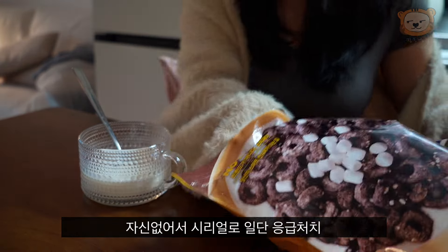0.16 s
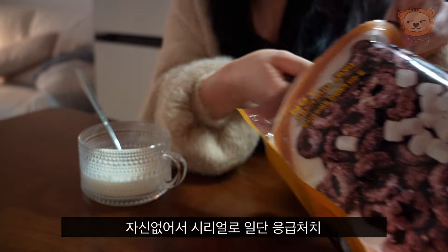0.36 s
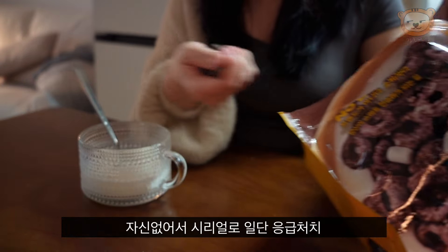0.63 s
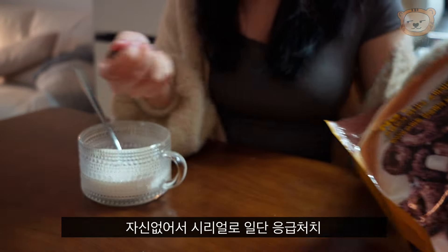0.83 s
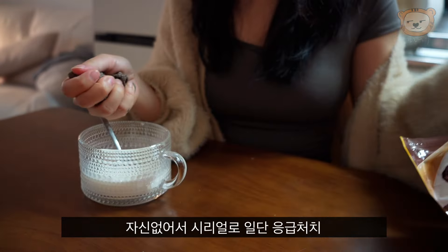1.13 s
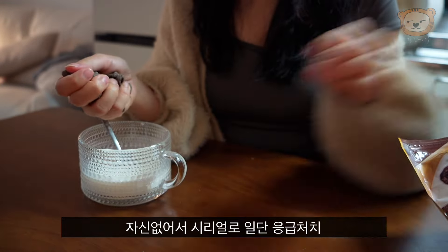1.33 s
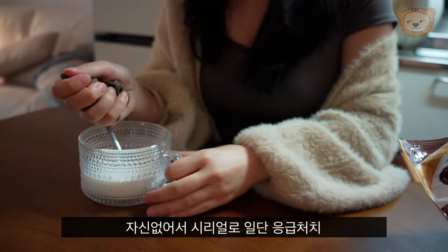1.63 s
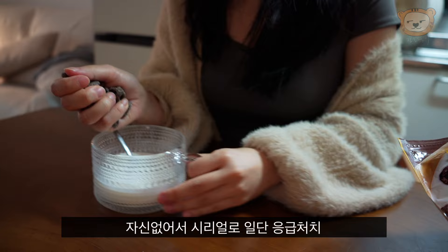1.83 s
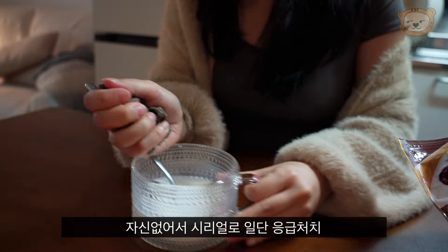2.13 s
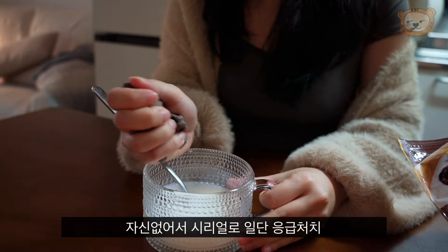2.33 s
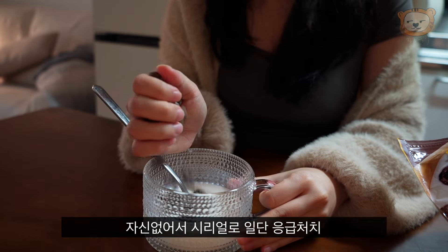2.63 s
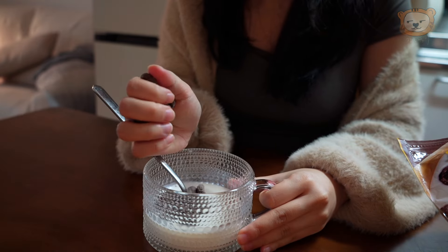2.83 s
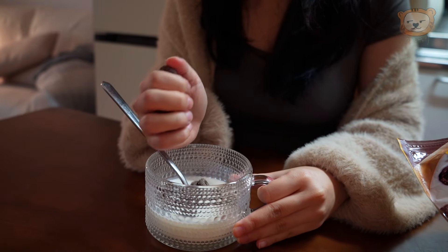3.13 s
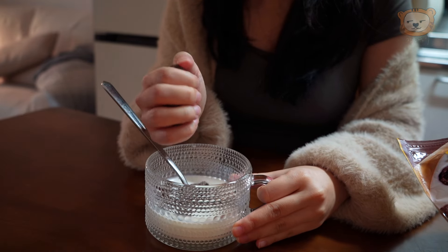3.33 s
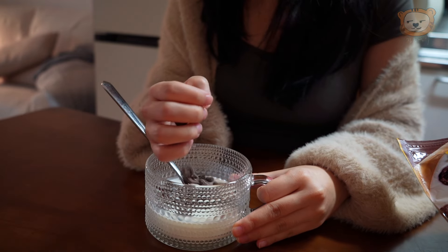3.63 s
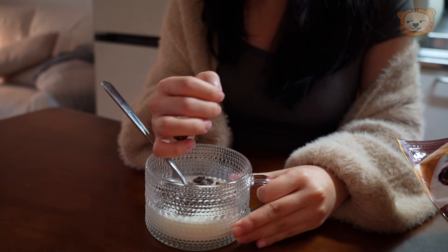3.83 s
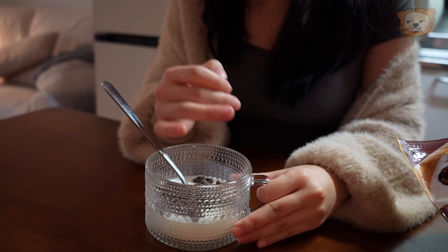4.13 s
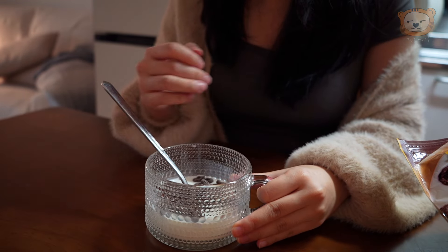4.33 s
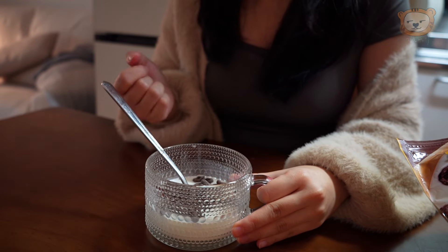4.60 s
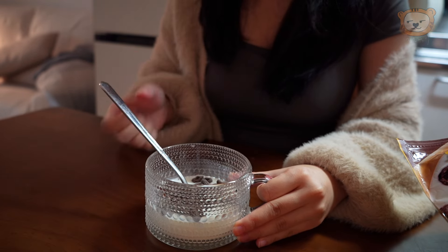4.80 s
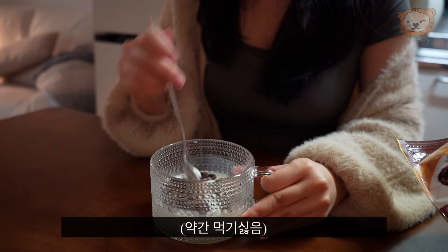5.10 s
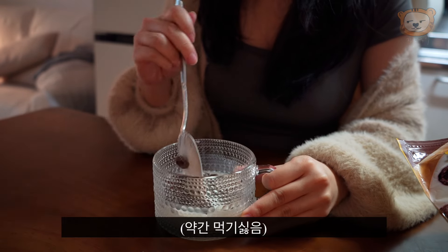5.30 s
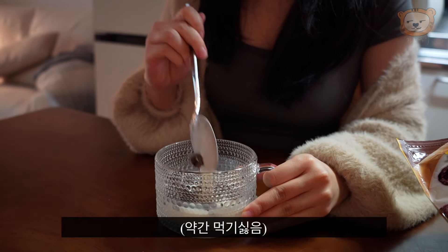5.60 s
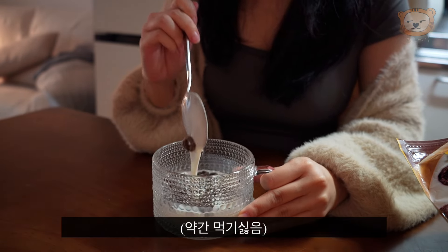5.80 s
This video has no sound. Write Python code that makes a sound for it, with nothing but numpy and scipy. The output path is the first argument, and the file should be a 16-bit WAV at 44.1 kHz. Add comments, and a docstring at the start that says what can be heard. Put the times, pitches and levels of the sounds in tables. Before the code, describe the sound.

In a small quiet room, close to the microphone, a full plastic bag crinkles, rubs and bumps the table. A glass mug then scrapes and judders over the wood with its spoon ticking. Dry cereal rings fall in two small clusters, with tiny cracks, glass pings and soft plops. Finally the spoon clinks and the mug is nudged with dull knocks.

```python
"""Cereal dropping into a mug of milk

A hand leaves a plastic cereal bag (noise grains and creasing snaps), which is put aside on a wooden table.
A glass mug of milk drags closer (stick-slip through table modes), its spoon rattling in decaying modes.
Cereal rings drop in a few at a time, each a crack, glass ping and thud; then the spoon is picked up
and bumps the bottom through the milk. A small, quiet room rings after it all, over still air."""
import sys
import numpy as np
from scipy import signal
from scipy.fft import rfft, irfft, next_fast_len
from scipy.io import wavfile

SR = 44100
rng = np.random.default_rng(int(sys.argv[2]) if len(sys.argv) > 2 else 0)


def wrap_up_sound(samples):
    """Save the sound to the file named by the first command line argument, as 16-bit audio."""
    columns = np.atleast_2d(samples).T
    # keep every value between -1 and 1, then stretch to whole-number steps
    tamed = np.clip(columns, -1, 1)
    steps = np.round(tamed * 32767).astype(np.int16)
    wavfile.write(sys.argv[1], SR, steps)


N = 262395
TIME = np.arange(N) / SR
AGE = TIME[:SR // 2]  # seconds since a blow

# table top under the mug: pitch_hz, level_db, t60_s
TABLE_MODES = [(175.4, -1.5, 0.15), (281.5, 2.5, 0.18), (295, 2.5, 0.045), (308, -4, 0.12), (400, -29, 0.1),
               (485.5, 0.5, 0.077), (582, -24, 0.13), (692, 3, 0.032), (774, -28, 0.032), (944, -12, 0.038),
               (1130, -7.5, 0.075), (1200, -25, 0.094)]
# hiss spectrum of film, also used for the faint gratings: freq_hz, density_db (per Hz)
FILM_COLOUR = [(1500, 1), (3500, 4), (5500, 0.5), (7000, -4.5), (9000, -7), (10500, -16.5), (16000, -26)]
# brittle crack or tick of a hard contact: freq_hz, density_db (per Hz)
CRACK_COLOUR = [(200, 13.5), (600, -20.5), (1500, 2), (2400, 7.5), (3100, -1), (5000, 5.5), (7000, 2.5),
                (9300, -0.5), (10700, -10.5), (13000, -8), (16000, -47)]
# broad thud and scrape of contacts on the table: freq_hz, density_db (per Hz)
THUD_COLOUR = [(40, -15), (130, -32.5), (210, -9.5), (280, 0), (490, -1), (720, -13.5), (1200, -55),
               (2000, -25), (5000, -86)]


def undb(db):
    """Decibels to gain."""
    return 10 ** (np.asarray(db) / 20)


def unit(x):
    """Scale to rms 1."""
    return x / np.sqrt(np.mean(x ** 2))


def crest(x):
    """Scale to peak 1."""
    return x / np.abs(x).max()


def along(points, hz):
    """Read (Hz, value) points on a log-frequency axis."""
    freq_hz, value = np.transpose(points)
    return np.interp(np.log(hz + 1), np.log(freq_hz), value)


def colour(x, points, tilt=0):
    """Minimum-phase filter with the given spectrum, tilted in dB per octave around 1 kHz."""
    size = 2 * next_fast_len(len(x))
    hz = np.fft.rfftfreq(size, 1 / SR)
    octaves = np.log2(np.maximum(hz, 200) / 1000)
    gain = undb(along(points, hz) + tilt * octaves)
    # fold the cepstrum onto positive time, so that nothing sounds before its cause
    cepstrum = irfft(np.log(gain))
    cepstrum[1:size // 2] *= 2
    cepstrum[size // 2 + 1:] = 0
    response = np.exp(rfft(cepstrum))
    return irfft(rfft(x, size) * response)[:len(x)]


def grains(rate, spread_db):
    """Random tiny slips, rate per second, of uneven size."""
    happens = rng.random(N) < rate / SR
    sign = rng.choice([-1, 1], N)
    size = undb(spread_db * np.minimum(rng.exponential(size=N), 4))
    return happens * sign * size


def burst(t60):
    """A brief crush of contacts: random signs that die away by 60 dB in t60 seconds."""
    return rng.choice([-1., 1.], len(AGE)) * undb(-60 * AGE / t60)


def ring(modes, tilt=0, detune=0):
    """Decaying modes; every blow lands elsewhere and weights them anew."""
    hz, db, t60 = np.transpose(modes)[:, :, None]
    db = db + rng.standard_normal(hz.shape) + tilt * np.log2(hz / hz[0])
    hz = hz * (1 + detune * rng.standard_normal(hz.shape))
    partials = undb(db - 60 * AGE / t60) * np.cos(2 * np.pi * hz * AGE)
    return np.sum(partials, axis=0)


def strokes(rows, attack_s, t60, column=2):
    """Gain of (start, length, dB..) movements: each builds up, holds and dies away."""
    gain = np.zeros(N)
    for row in rows:
        age = TIME - row[0]
        attack = np.clip(age / attack_s, 0, 1)
        level_db = row[column] - 60 * np.maximum(age - row[1], 0) / t60
        gain = np.maximum(gain, attack * undb(level_db))
    return gain


def add(track, s, sound):
    """Mix a sound in at time s."""
    start = max(int(s * SR), 0)
    track[start:start + len(sound)] += sound[:N - start]


def air():
    """Still air of the quiet room: steady noise, mostly low."""
    # spectrum of the air: freq_hz, density_db (per Hz)
    air_colour = [(15, -59), (25, -4), (64, 2), (96, -3.5), (178, 1), (340, -4), (368, -4), (509, -5),
                  (631, -11.5), (804, -9), (895, -13), (1020, -11.5), (2360, -19), (15500, -35)]
    return undb(-55) * unit(colour(rng.standard_normal(N), air_colour))


def room(x, wet_db):
    """A diffuse noise tail whose bands die at their own rates."""
    # decay of the room: freq_hz, t60_s
    decay = [(150, 0.22), (400, 0.24), (1000, 0.32), (2800, 0.34), (7000, 0.3), (15000, 0.2)]
    hz = np.fft.rfftfreq(len(AGE), 1 / SR)
    noise = rfft(rng.standard_normal(len(AGE)))
    centres, t60s = np.transpose(decay)
    tail = 0
    for share, t60 in zip(np.eye(len(decay)), t60s):
        # each band overlaps its neighbours in a triangle on the log axis
        band = irfft(noise * along(np.c_[centres, share], hz), len(AGE))
        tail = tail + band * undb(-60 * AGE / t60)
    tail = tail * (1 - np.exp(-AGE / 0.0063))  # reflections take a moment to build up
    return undb(wet_db) * signal.fftconvolve(x, tail / np.linalg.norm(tail))[:N]


def bag():
    """The heavy bag rubs, rumbles and bumps; its film creases in dense tiny snaps."""
    # bag and sleeve bumping the table: start_s, thump_peak_db, film_snap_peak_db
    bumps = [(0.0, -21.5, -25.5), (0.031, -18.5, -45), (0.719, -37.5, -42), (0.863, -31, -40),
             (1.179, -22, -41), (1.211, -19, -20)]
    # the bag moving through the air, its film flexing: start_s, length_s, hiss_db, crinkle_db
    moves = [(0.0, 0.015, -48, -37.5), (0.085, 0.44, -47, -71), (0.55, 0.17, -52, -56.5),
             (0.68, 0.2, -48, -50.5), (0.93, 0.22, -53, -52.5)]
    # hand or table rubbing along the bag: start_s, length_s, rubbing_db, crinkle_db, load_rumble_db
    rubs = [(0.0, 0.02, -37, -38.5, -43), (0.028, 0.057, -33.5, -45, -35), (0.095, 0.1, -30.5, -34.5, -45),
            (0.35, 0.039, -45.5, -51, -68), (0.85, 0.062, -44.5, -64, -77), (1.07, 0.15, -43.5, -52, -68),
            (1.203, 0.074, -37.5, -42.5, -69)]
    # spectrum of rubbing and thumps: freq_hz, density_db (per Hz)
    rub_colour = [(30, -16), (100, -10), (200, -4), (400, 1.5), (750, 0), (1100, -7.5), (1800, -11),
                  (4000, -52)]
    # spectrum of creasing film: freq_hz, density_db (per Hz)
    crinkle_colour = [(500, 11.5), (1200, 7), (2000, 7.5), (3200, 2), (4500, -1.5), (7000, -45)]
    # the cereal's weight shifting in the bag: freq_hz, density_db (per Hz)
    rumble_colour = [(25, -22), (65, 4), (180, 0), (300, 4), (700, -51)]
    # the film snapping taut: freq_hz, density_db (per Hz)
    snap_colour = [(300, 0), (1000, 1.5), (3000, 1.5), (4200, -3), (6200, -7), (8000, -28), (11000, -33),
                   (16000, -36)]
    rub_attack_s, rub_t60_s, crease_t60_s = 0.0068, 0.31, 0.11
    flex_attack_s, flex_t60_s = 0.0089, 0.42
    rub_hiss_db = -17  # hiss of the film against the rubbing

    rub = strokes(rubs, rub_attack_s, rub_t60_s)
    crease = strokes(rubs, rub_attack_s, crease_t60_s, column=3)
    load = strokes(rubs, rub_attack_s, rub_t60_s, column=4)
    hiss = strokes(moves, flex_attack_s, flex_t60_s)
    flex = strokes(moves, flex_attack_s, flex_t60_s, column=3)

    out = rub * unit(colour(grains(2500, spread_db=1.5), rub_colour))
    out += np.hypot(crease, flex) * unit(colour(grains(2200, spread_db=3.2), crinkle_colour))
    film_gain = np.hypot(hiss, undb(rub_hiss_db) * rub)
    out += film_gain * unit(colour(grains(9000, spread_db=1.0), FILM_COLOUR))
    out += load * unit(colour(rng.standard_normal(N), rumble_colour))
    for s, thump_db, snap_db in bumps:
        thump = crest(colour(burst(t60=0.1), rub_colour, tilt=-3.7))
        snap = crest(colour(burst(t60=0.02), snap_colour))
        add(out, s, undb(thump_db) * thump)
        add(out, s, undb(snap_db) * snap)
    return out


def faint_grating():
    """Fingers working dry rings, and at the end the spoon lifting out of the milk: streams of tiny slips."""
    # faint gratings: start_s, length_s, level_db
    gratings = [(1.99, 0.08, -59), (2.42, 0.33, -60), (3.3, 0.19, -70), (4.22, 0.33, -62.5),
                (5.36, 0.08, -71), (5.445, 0.019, -55.5)]
    texture = unit(colour(grains(1700, spread_db=-2.5), FILM_COLOUR, tilt=-0.66))
    return strokes(gratings, attack_s=0.016, t60=0.2) * texture


def knocks():
    """Knocks and judder: a rounded push, shorter for harder contact, rings the table's modes."""
    # dull knocks on the table top, and the judder of the mug as it is dragged:
    # start_s, level_db, hardness_db_per_octave
    blows = [(1.617, -44, -2.5), (1.672, -40.5, -3.5), (1.697, -38.5, -10), (1.75, -39.5, -12),
             (1.821, -37, -6), (1.851, -41.5, -6), (1.897, -40.5, -6.5), (2.026, -35.5, 2),
             (2.035, -32, -4.5), (2.108, -35.5, -2.5), (2.397, -50.5, -8.5), (4.748, -33.5, 0.5),
             (4.761, -49.5, 7.5), (5.234, -45, 1.5), (5.294, -60, 3), (5.842, -45, 0.5), (5.885, -38, 0),
             (5.9, -37, -14)]
    out = np.zeros(N)
    for s, db, hardness in blows:
        rise_s = 0.00022 * undb(-hardness)
        push = AGE * np.exp(-AGE / rise_s)
        body = signal.fftconvolve(ring(TABLE_MODES, tilt=hardness + 4.8), push)[:len(AGE)]
        thud = unit(colour(burst(t60=0.03), THUD_COLOUR, hardness))
        blow = unit(body) + undb(-6) * thud
        add(out, s, undb(db) * unit(blow))
    return out


def drag():
    """The glass foot sticks and slips on the wood: the mug rocks and the table top drones."""
    # pushes that slide the mug's foot: start_s, length_s, level_db, gritty_overtones_db
    slides = [(1.6, 0.011, -37, -66), (1.66, 0.27, -37, -57), (1.897, 0.13, -29, -60),
              (1.99, 0.14, -25, -48), (2.14, 0.11, -29, -71), (3.035, 0.11, -39, -61),
              (4.94, 0.18, -42.5, -81), (5.228, 0.016, -32.5, -49), (5.7, 0.2, -53, -76),
              (5.84, 0.054, -26.5, -40)]
    # the mug rocking on its foot while it slides: pitch_hz, level_db, t60_s
    rocking_modes = [(459, -3, 0.17), (479.3, -5, 0.088)]
    # the foot's grit: freq_hz, density_db (per Hz)
    grit_colour = [(400, -25), (650, 1), (800, 17.5), (1000, -13), (1250, 13), (1600, -16), (3000, -28.5)]
    attack_s, slide_t60_s, grit_t60_s = 0.014, 0.23, 0.13

    slips = grains(1000, spread_db=0.5)
    body = unit(signal.fftconvolve(slips, ring(TABLE_MODES, tilt=0.21))[:N])
    rocking = unit(signal.fftconvolve(grains(300, spread_db=5.5), ring(rocking_modes))[:N])
    scrape = unit(colour(grains(1200, spread_db=-1.5), THUD_COLOUR, tilt=0.64))
    grit = unit(colour(slips, grit_colour))
    speed = strokes(slides, attack_s, slide_t60_s)
    bite = strokes(slides, attack_s, grit_t60_s, column=3)
    friction = undb(-8) * body + undb(-5.5) * rocking + undb(-7) * scrape
    return speed * friction + bite * grit


def spoon():
    """Steel touches glass: a tick, the low bending modes of the wall and a thin upper ring."""
    # touches: start_s, upper_ring_peak_db, low_ring_peak_db, favoured_hz at that spot, tick_peak_db
    clinks = [(1.615, -43.5, -44.5, 4560, -37.5), (1.644, -51, -58, 6342, -62),
              (1.682, -39.5, -30, 4800, -48), (5.016, -60, -60, 4225, -36.5),
              (5.079, -47.5, -43, 4170, -31.5)]
    # the modes that the spoon's edge wakes: pitch_hz, level_db, t60_s
    modes = [(1863, -10, .25), (1950, -12, .12), (2020, -3, .26), (2070, 0, .2), (2170, -11, .1),
             (4225, -9, .18), (4455, -5, .22), (4795, -9, .12), (4893, -9, .12), (5400, -10, .06),
             (6342, -11, .18), (6918, -14, .14), (8285, -9, .22), (10190, -13, .17), (11900, -18, .14)]
    low = [mode for mode in modes if mode[0] < 3000]
    upper = [mode for mode in modes if mode not in low]
    out = np.zeros(N)
    for s, high_db, low_db, favoured_hz, tick_db in clinks:
        high = []
        for hz, db, t60 in upper:
            boost_db = 9 * np.exp(-((hz - favoured_hz) / 200) ** 2)
            high.append((hz, db + boost_db, t60))
        tick = colour(burst(t60=0.021), CRACK_COLOUR, tilt=0.66)
        add(out, s, undb(low_db) * crest(ring(low, detune=0.002)))
        add(out, s, undb(high_db) * crest(ring(high)))
        add(out, s, undb(tick_db) * crest(tick))
    return out


def cereal():
    """Each crisp ring clicks at its own pitch, skitters, pings the glass, thuds into the mug and hops once."""
    # cereal rings landing: start_s, crack_db, glass_ring_db, thud_db, crispness_db_per_octave
    landings = [(2.5764, -60.5, -85, -54, 3.5), (2.593, -57.5, -57, -55.5, 0), (2.635, -65.5, -81, -63, 6),
                (2.6545, -59.5, -56.5, -53.5, 5.5), (2.6907, -59.5, -67, -58.5, 1.5),
                (2.7085, -64, -83, -64, 2.5), (2.7285, -69, -82, -67, 13), (2.758, -62, -55.5, -57, 1),
                (2.7764, -64, -79, -73, -1.5), (2.8589, -67.5, -85, -68, 0.5), (2.8727, -72.5, -85, -76, 6),
                (2.945, -58, -51, -54, -1), (3.026, -62.5, -69.5, -60.5, 12),
                (3.458, -59.5, -53, -49.5, 0.5), (3.483, -55, -60, -64, -2), (3.5354, -66, -59, -57.5, 1),
                (3.55, -63.5, -80, -66, 2), (3.625, -61, -63.5, -57, 0), (3.6349, -64, -72, -65, -14),
                (3.6459, -69, -80, -65.5, 5), (3.6757, -63.5, -60, -55.5, 1), (3.7022, -67, -68, -86, 1),
                (3.7711, -63, -61, -54, 2.5), (3.8749, -63.5, -84, -60, -1.5), (3.9226, -63, -70, -60, 5),
                (4.1278, -63, -67.5, -62, 4.5)]
    # mug with the spoon in it, damped by milk and fingers: pitch_hz, level_db, t60_s
    glass_modes = [(700, -12, .08), (877, -10, .09), (1138, -8, .11), (1255, -11, .11), (1825, -7, .08),
                   (1866, -2, .2), (1897, -2, .2), (1955, -3, .12), (2062, -1, .17), (2182, -2, .14),
                   (2300, -13, .06), (2440, -7, .09), (2550, -8, .11), (3890, -9, .05), (4475, -9, .13),
                   (4700, -8, .04), (4900, -6, .08), (5065, -5, .09), (5300, -9, .04), (6260, -12, .06),
                   (8275, -18, .1)]
    # a ring thudding into the milk: freq_hz, density_db (per Hz)
    plop_colour = [(60, -12), (170, -40), (260, 1.5), (340, 4), (490, 0), (620, -15), (1200, -13.5),
                   (2000, -39), (5000, -47)]
    click_hz, click_spread_oct = 5000, 0.034  # a ring's own click, and how the pieces differ
    bounce_s, bounce_spread_oct, bounce_db = 0.008, 0.43, -8  # the hop, landing more softly

    out = np.zeros(N)
    for s, crack_db, glass_db, thud_db, crispness in landings:
        piece_hz = click_hz * 2 ** (click_spread_oct * rng.standard_normal())
        hop_s = bounce_s * 2 ** (bounce_spread_oct * rng.standard_normal())
        for delay, db in (0, crack_db), (hop_s, crack_db + bounce_db):
            skitter = unit(grains(2200, spread_db=2.5))[:len(AGE)] * burst(t60=0.081)
            contact = burst(t60=0.016) + undb(-6) * skitter
            crack = unit(colour(contact, CRACK_COLOUR, crispness))
            piece = ring([(piece_hz, 0, 0.002)])
            click = unit(signal.fftconvolve(burst(t60=0.008), piece)[:len(AGE)])
            add(out, s + delay, undb(db) * (crack + undb(-13) * click))
        # the rocking milk shifts the wall's modes a little from hit to hit; the crumbly crust blurs the blow
        wall = ring(glass_modes, detune=0.003)
        ping = unit(signal.fftconvolve(wall, burst(t60=0.004))[:len(AGE)])
        thud = unit(colour(burst(t60=0.049), plop_colour))
        add(out, s, undb(glass_db) * ping)
        add(out, s, undb(thud_db) * thud)
    return out


def scene():
    """All the handling in the room, over still air."""
    # what the table top radiates from a cushioned contact: freq_hz, gain_db
    cushion = [(30, -5), (80, -12.5), (140, -17.5), (230, -1), (800, -1), (1250, -13), (1700, -12),
               (2500, -18), (5000, -69)]
    # the small mug radiates hardly any bass: freq_hz, gain_db
    bass_loss = [(70, -13), (140, -19), (240, 0), (1000, 0)]
    # the mug's wall shades the direct treble; the room hears all of it through the open top: freq_hz, gain_db
    shade = [(5000, 1.5), (9000, -0.5), (11000, -3.5), (16000, -3)]
    table = colour(drag() + knocks(), cushion)
    rustle = bag() + faint_grating()
    mug = colour(cereal() + spoon(), bass_loss)
    direct = table + rustle + colour(mug, shade)
    reverb = room(table, wet_db=-8.0) + room(rustle, wet_db=-9.5) + room(mug, wet_db=0)
    return (air() + direct + reverb)[None]


def record(dry):
    """A steep elliptic low-pass cuts the top above 15.9 kHz."""
    low_pass = signal.ellip(10, 0.2, 70, 15900, fs=SR, output="sos")  # ripple 0.2 dB, stop band -70 dB
    return signal.sosfilt(low_pass, dry)


dry = scene()
out = record(dry)
wrap_up_sound(out)
```